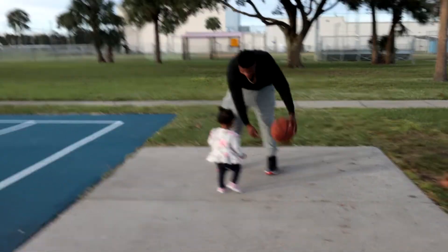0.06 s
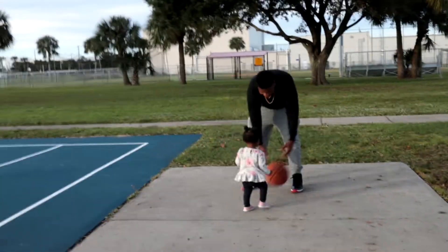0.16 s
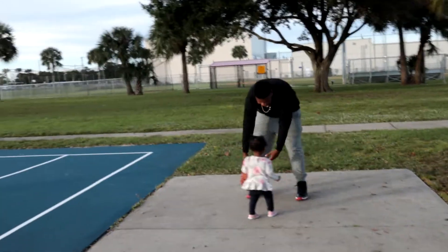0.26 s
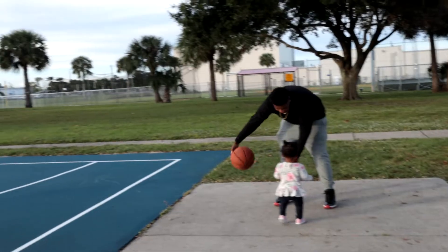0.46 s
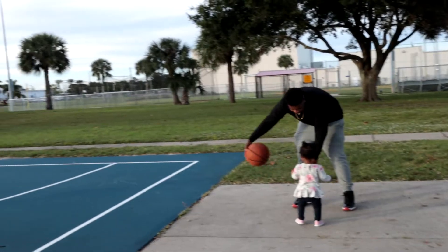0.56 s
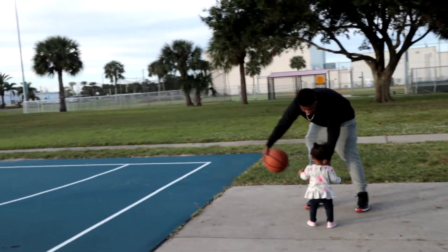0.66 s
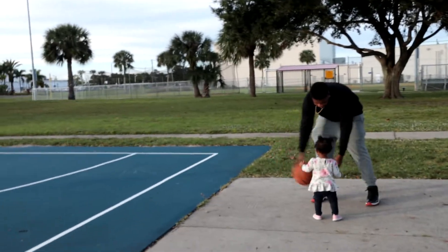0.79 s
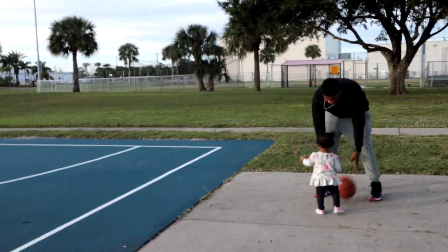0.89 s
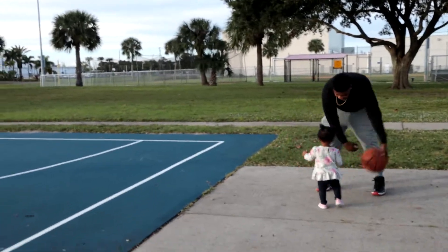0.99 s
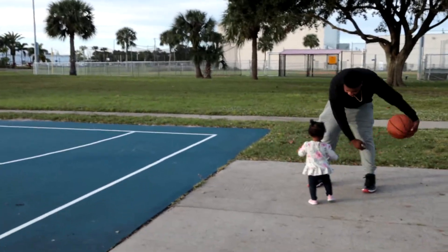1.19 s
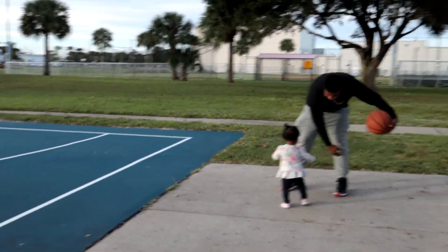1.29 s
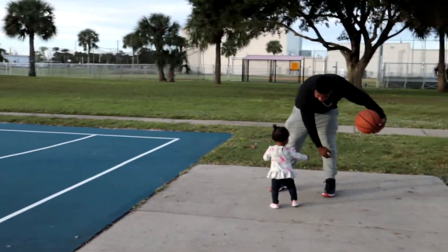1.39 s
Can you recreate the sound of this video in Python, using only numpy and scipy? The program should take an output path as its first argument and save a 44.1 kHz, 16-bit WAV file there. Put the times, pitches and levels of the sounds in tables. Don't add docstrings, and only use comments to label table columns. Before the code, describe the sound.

Outdoors on an open court, a ball smacks a slab, wind immediately thuds and crackles into the handheld stereo microphone, a shoe knocks and crunches softly, then the ball smacks again and quiet distant hum remains.

```python
import sys
import numpy as np
from scipy import signal
from scipy.io import wavfile
from scipy.ndimage import uniform_filter1d

SR = 44100
rng = np.random.default_rng(int(sys.argv[2]) if len(sys.argv) > 2 else 0)


def boost_factor(decibels):
    exponent = np.asarray(decibels, float) / 20
    return 10 ** exponent


def int16_out(signal):
    q = np.round(np.clip(np.atleast_2d(signal).T, -1, 1) * 32767)
    wavfile.write(sys.argv[1], SR, q.astype(np.int16))


N = 63945
T = np.arange(N) / SR
SIDE = np.array([[1], [-1]])


def rms_one(x):
    return x / np.sqrt(np.mean(x ** 2) + 1e-20)


def drift(rate):
    r = np.exp(-40 * np.pi * rate / SR)
    slow = signal.lfilter([1], [1, -2 * r, r * r], rng.standard_normal(N // 20 + 2002))[2000:]
    return np.interp(np.arange(N) / 20, np.arange(len(slow)), rms_one(slow))


def cut(x, hz, kind, order=2):
    return signal.sosfilt(signal.butter(order, hz, kind, fs=SR, output="sos"), x)


def noise(spectrum, patchy_db=0, rate=12, envelope=1):
    spectrum_hz, spectrum_db = np.transpose(spectrum)
    edges = 25 * 2 ** np.arange(0, 9.6, .5)
    together = drift(rate)
    white = rng.standard_normal((2, N + 4000))
    white[:, :4000] *= np.size(envelope) == 1
    white[:, 4000:] *= envelope
    out, power = 0, 0
    for k, (low, high) in enumerate(zip(edges, edges[1:])):
        gain = boost_factor(np.interp(np.log(low * high) / 2, np.log(spectrum_hz), spectrum_db))
        power += gain ** 2 * (high - low) * 2.2 / SR
        flicker = boost_factor(patchy_db * (together + 0.77 * drift(rate))) if patchy_db else 1
        band = cut(white[k % 2] + 1e-18, [low, high], "band")[4000:]
        out = out + gain * flicker * band
    return out / np.sqrt(power)


def strikes(s, db):
    x = np.full(N, 1e-18)
    x[(np.asarray(s) * SR).astype(int)] = boost_factor(np.asarray(db))
    return x


def ring(clicks, hz, t60):
    r, w = boost_factor(-60 / (t60 * SR)), 2 * np.pi * hz / SR
    return signal.lfilter([0, np.sin(w)], [1, -2 * r * np.cos(w), r * r], clicks)


def dying(clicks, t60):
    return signal.lfilter([1], [1, -boost_factor(-60 / (t60 * SR))], clicks)


def puff(s, db, hz, front, back, turn):
    cycles = (T - s) * hz
    bell = np.exp(-.5 * (cycles / np.where(cycles < 0, front, back)) ** 2)
    return boost_factor(db) * bell * np.cos(2 * np.pi * cycles + turn)


def wide_bass():
    return 1 / (1 + np.exp((T - 0.566) / 0.0046))


def ball():
    # start_s, level_db, thump_db, left_right_db, crack_db
    bounces = [
        (0.3162, -11.5, -17, -1.5, 2),
        (0.9924, -12, -19, 0, 1.5),
    ]
    # pitch_hz, first_bounce_db, second_bounce_db, t60_s
    modes = [(726, -6.5, -15, 0.081), (830, -8, 3.5, 0.023), (984, 5, 5.5, 0.027), (1324, 5.5, -5, 0.034),
             (1460, 2.5, -6, 0.013), (1880, -12, -1, 0.033), (2240, -29, -16, 0.0081),
             (2370, -4, -31, 0.028), (2760, -2.5, -23, 0.017), (3200, -19, -11, 0.011),
             (4210, -15, -13.5, 0.01), (4570, -18, -5, 0.011), (5040, -8, -5, 0.0092)]
    slap_hz = (1450, 1850)
    # pitch_hz, first_bounce_db, second_bounce_db, t60_s
    kerb = [(387, -43, -18.5, .08), (803, -19.5, -13, 0.031), (1690, -16.5, -31, 0.022),
            (2197, -26, -23, 0.055), (4500, -32, -24, 0.018)]
    # freq_hz, level_db per Hz
    crack = [(250, -34), (700, -11), (2000, -6), (3750, -8), (5140, -8.5), (7000, -12), (11500, -20.5),
             (15500, -43)]
    # freq_hz, level_db per Hz
    crack_side = [(300, -54), (1450, -0.5), (2370, -2), (3630, -17), (6620, -8.5), (11500, -17),
                  (15500, -30.5)]
    # delay_s, level_db, cut_hz
    echoes = [(.0118, -11.5, 1400), (0.031, -15, 1500)]

    s, db, thump_db, pan_db, crack_db = np.transpose(bounces)
    spread_db = rng.normal(0, 0.62, (len(s), len(modes)))
    mid = np.zeros(N)
    for k, (hz, *mode_db, t60_s) in enumerate(modes):
        blow = strikes(s + 0.000846, db + mode_db - 10 + spread_db[:, k])
        mid += (-1) ** k * ring(blow, hz, t60_s)
    for start_s, level_db, hz in zip(s, db, slap_hz):
        mid += puff(start_s + .0004, level_db + 4, hz, .3, .35, 0)
    mid -= ring(strikes(s + 0.00064, thump_db), 194, 0.05)
    for hz, *kerb_db, t60_s in kerb:
        mid += ring(strikes(s + echoes[0][0], db + kerb_db), hz, t60_s)

    crack_env = dying(strikes(s, db + crack_db), 0.013)
    tail_env = dying(strikes(s, db), 0.49)
    mid += noise(crack, envelope=boost_factor(-9) * crack_env + boost_factor(-34) * tail_env)
    mid = signal.lfilter(*signal.iirnotch(3700, 7.1, SR), mid)
    side = noise(crack_side, envelope=boost_factor(-10) * crack_env + boost_factor(-32) * tail_env)
    direct = boost_factor(SIDE * np.interp(T, s, pan_db) / 2) * mid + SIDE * side

    out = direct
    for delay_s, echo_db, cut_hz in echoes:
        late = np.roll(direct[::-1], int(delay_s * SR), axis=1)
        out = out + boost_factor(echo_db) * cut(late, [550, cut_hz], "band")
    return out


def shoe():
    # start_s, knock_db, grit_db, side_db
    steps = [
        (0.7713, -83, -35, -50),
        (0.893, -48, -39, -37),
        (0.9156, -19.5, -21.5, -16.5),
        (0.925, -14, -25.5, -42),
        (0.9301, -55, -30.5, -19),
    ]
    # pitch_hz, level_db, t60_s
    sole = [(293, -4, 0.065), (560, -20, 0.028), (400, -5, 0.05), (448, -7, 0.078), (1150, -12.5, 0.027),
            (2210, -18, .02)]
    # freq_hz, level_db per Hz
    grit = [(530, -9), (900, -5.5), (2200, -14), (2880, -18.5), (9870, -29), (12000, -11.5), (15500, -57)]
    # freq_hz, level_db per Hz
    grit_side = [(300, -54), (1240, -9.5), (3150, -18), (4120, -26), (8660, -28), (10500, -26.5),
                 (15500, -51)]

    s, knock_db, grit_db, side_db = np.transpose(steps)
    grit_t60_s = .018
    knock = sum(ring(strikes(s, knock_db + mode_db), hz, t60_s) for hz, mode_db, t60_s in sole)
    crunch = noise(grit, envelope=dying(strikes(s, grit_db), grit_t60_s))
    side = noise(grit_side, envelope=dying(strikes(s, side_db), grit_t60_s))

    scuff_s, scuff_width_s = 1.163, 0.049
    hiss = rms_one(cut(rng.standard_normal((2, N)), [4400, 12300], "band"))
    drag = np.exp(-.5 * ((T - scuff_s) / scuff_width_s) ** 2) * boost_factor(0.83 * drift(53))
    scuff = drag * (boost_factor(-52.5) * hiss[0] + SIDE * boost_factor(-44) * hiss[1])
    return cut(knock, 290, "high") + crunch + SIDE * side + scuff


def eddies():
    # start_s, peak_db, pitch_hz, left_right_db
    bursts = [(0.0294, -28, 250, 55), (0.231, -15, 254, 16), (0.2943, -4.5, 282, -20),
              (0.3062, 0.5, 298, 13), (0.3643, -2, 294, 7), (0.3753, -24, 301.0, 15),
              (0.3817, -6.5, 349.0, -36), (0.4005, -3.5, 290, 13), (0.4083, -9.5, 354.0, 7),
              (0.4205, -5, 315.0, 21), (0.4288, -8, 250, 6), (0.461, -9, 400.0, 27),
              (0.4919, -6.5, 420, 21), (0.4974, -11.5, 255.0, 9.3), (0.5085, -1, 400, 32.5),
              (0.516, -7.5, 330, 24), (0.5325, -3.5, 200, 7), (0.5402, -5.5, 290, 21),
              (0.5544, -8.5, 362, 26), (0.559, -11, 306, 25), (0.57, -7, 560, 37), (0.573, -3.5, 310, 13),
              (0.6, -15.5, 400, 1.5), (0.616, -22, 302, -1.5), (0.6291, -15.5, 288, 1),
              (0.65, -10, 291, 0.5), (0.6796, -14.5, 490, 4), (0.694, -13, 380, -1),
              (0.721, -12.5, 368.0, 0.5), (0.7554, -18.5, 262, 0.7), (0.584, -24, 202, 1),
              (0.6578, -16, 495, 3), (0.667, -22, 260, -3), (0.6746, -18, 380, -1), (0.685, -21, 365, -3),
              (0.713, -19, 400, 3.5), (0.768, -28, 230, -2), (0.779, -28, 420, 3),
              (0.795, -22.5, 262, -0.5), (0.806, -24.5, 300, 0.5), (0.818, -29, 277, -0.2),
              (0.862, -25.5, 270, 0.5), (0.877, -27, 264, 1.3), (0.889, -27, 280, 1.3),
              (1.016, -24, 420, 1), (1.049, -31, 252, 0.2), (1.1, -28, 231, 1.3), (1.025, -25.5, 196, 0.5),
              (1.085, -26, 196, -0.2), (1.137, -35, 198, 1)]
    # start_s, peak_db, pitch_hz, rise_cycles, suck_db
    slams = [
        (.4451, 2, 360, .045, -9),
        (.4502, -.5, 280, .14, -14),
        (.4563, 0.5, 350, .13, -3),
    ]

    phase = rng.uniform(-0.89, 0.24, len(bursts))
    soft = np.zeros((2, N))
    for (s, db, hz, pan_db), turn in zip(bursts, phase):
        soft += boost_factor(np.minimum(SIDE * pan_db, 0)) * puff(s, db - 3, hz, .3, 0.48, turn)
    soft = soft + SIDE * boost_factor(-13) * cut(soft[0] - soft[1], 420, "high")

    hard = np.zeros((2, N))
    for s, db, hz, rise, suck_db in slams:
        push = puff(s, db, hz, rise, .3, 0)
        suck = puff(s - 3.2 * rise / hz, db + suck_db, hz, .2, rise, 0)
        hard += boost_factor(np.minimum(SIDE * 13, 0)) * (push - suck)
    hard[1] = np.roll(hard[1], -int(.0004 * SR))
    return cut(soft, 100, "high", order=1) + hard


def buffeting():
    # time_s, level_db
    gust = [(0, -35), (.11, -42), (.2, -36), (.26, -28.5), (.3, -20.5), (.455, -14.5), (.472, -34),
            (.49, -25.5), (.58, -24.5), (.6, -25.5), (.7, -28.5), (.82, -35), (.84, -50), (.87, -45),
            (.97, -47), (1.02, -33.5), (1.16, -54), (1.45, -51.5)]
    # freq_hz, level_db per Hz
    buffet = [(18, -51), (40, -12), (97, -1), (230, 0.5), (420, -18.5), (700, -29), (1200, -41),
              (2600, -93)]
    # freq_hz, level_db per Hz
    buffet_side = [(18, -81), (30, -47), (200, 4), (412, -16.5), (447, -14), (562, -13), (610, -21.5),
                   (1500, -22.5), (1950, -66), (3300, -120)]
    # start_s, peak_db, pitch_hz
    swells = [(0.033, -28.5, 114), (0.141, -24.5, 113), (0.152, -20.5, 99), (0.198, -22.5, 134),
              (0.216, -23, 129), (0.274, -11.5, 169), (0.289, -11, 140), (0.321, -14, 138),
              (0.337, -13, 133), (0.36, -9, 137), (0.386, -9.5, 113), (0.404, -8, 116), (0.424, -18, 106),
              (0.439, -8, 137), (0.453, -6.5, 148), (0.498, -9.5, 151), (0.531, -22, 150),
              (0.543, -13, 145), (0.552, -20.5, 133), (0.572, -14, 127), (0.633, -26, 143),
              (0.697, -42, 136), (0.728, -26, 139), (0.767, -31, 159)]

    gust_db = np.interp(T, *np.transpose(gust)) - 2.5
    rumble = rms_one(cut(rng.standard_normal(N), [20, 75], "band"))
    sub = boost_factor(-35 + 0.12 * (gust_db + 37)) * rumble
    side = boost_factor(gust_db - 12) * noise(buffet_side, patchy_db=-4.0, rate=25)
    lumps = boost_factor(gust_db) * noise(buffet, patchy_db=2, rate=55)

    phase = rng.uniform(-3, 3.8, len(swells))
    heave = sum(puff(s, db - 1, hz, 0.44, 0.44, turn) for (s, db, hz), turn in zip(swells, phase))
    heave = heave * boost_factor(SIDE * 1 * wide_bass() / 2)
    return lumps + wide_bass() * (sub + SIDE * side) + heave


def traffic():
    # freq_hz, level_db per Hz
    far = [(24, -52), (60, -9), (229, -5), (440, -9.5), (749, -2), (1000, -4.5), (11300, -35), (14500, -66)]
    # freq_hz, level_db per Hz
    far_side = [(200, -68.5), (450, -43), (700, -14), (1100, -8.5), (2160, 1), (6000, -7), (11500, -7.5),
                (15000, -47)]

    wide_hum = rms_one(cut(rng.standard_normal(N), [200, 1210], "band"))
    wide_hum = wide_bass() * boost_factor(-49) * wide_hum
    mid = boost_factor(-40.5) * noise(far, patchy_db=1.18)
    side = boost_factor(-45.5) * noise(far_side, patchy_db=1.45)
    return mid + SIDE * (side + wide_hum)


def ducking():
    duck_s = 0.441
    after = np.maximum(T - duck_s, 0)
    fast_db = -16 * np.exp(-after / 0.039)
    slow_db = -8 * np.exp(-after / 0.26)
    return boost_factor(uniform_filter1d((T > duck_s) * (fast_db + slow_db), size=300))


def scene():
    return ducking() * traffic() + ball() + shoe() + buffeting() + eddies()


def low_pass(x):
    return signal.sosfilt(signal.butter(12, 16000, fs=SR, output="sos"), x)


def record(dry):
    dry = cut(dry, 52, "high")
    dry = cut(dry, 12450, "low", order=4)
    return low_pass(np.clip(dry, -1, 1))


dry = scene()
out = record(dry)
int16_out(out)
```